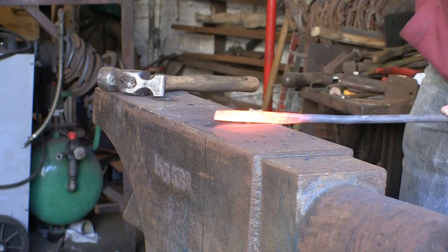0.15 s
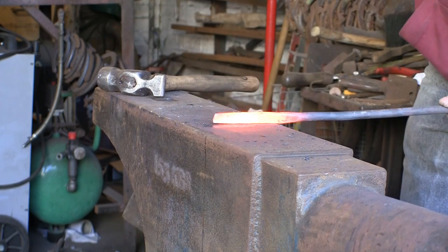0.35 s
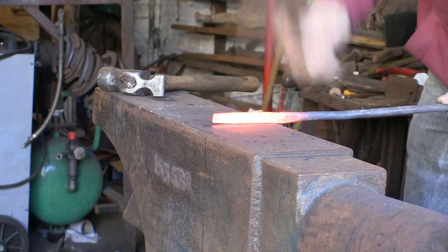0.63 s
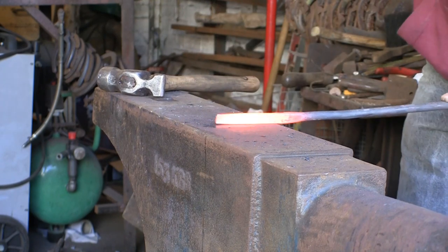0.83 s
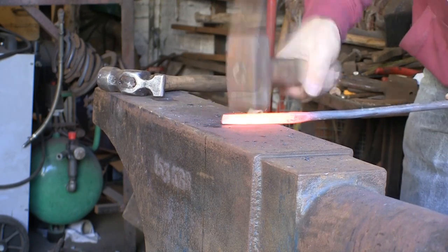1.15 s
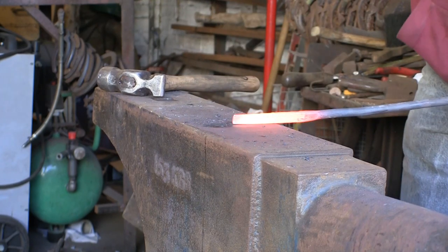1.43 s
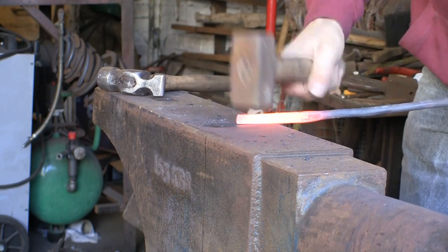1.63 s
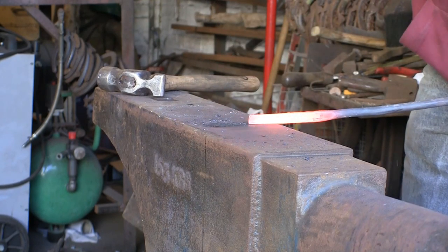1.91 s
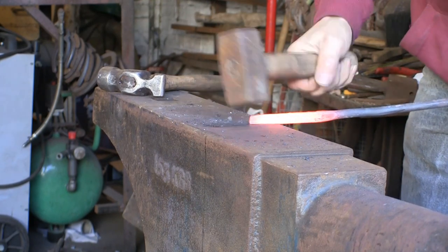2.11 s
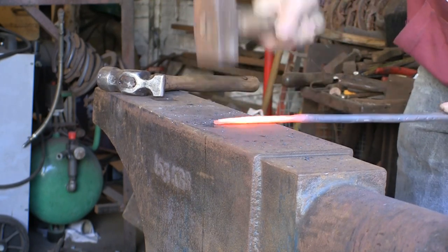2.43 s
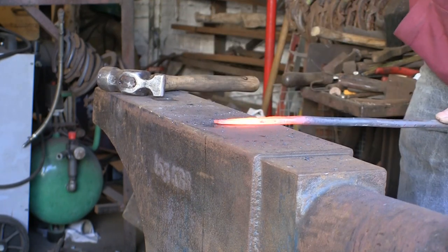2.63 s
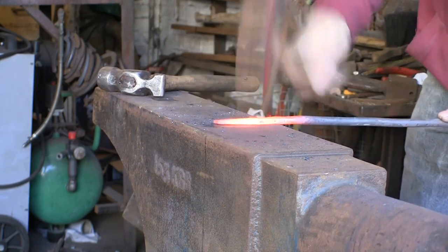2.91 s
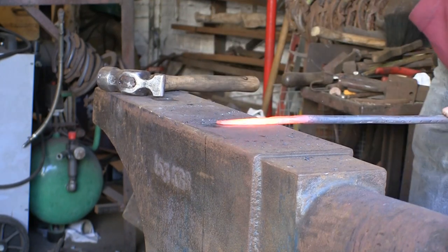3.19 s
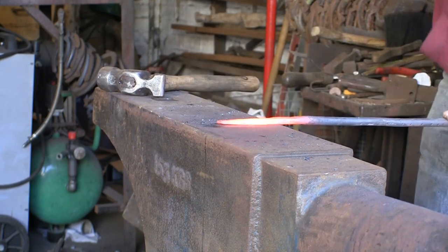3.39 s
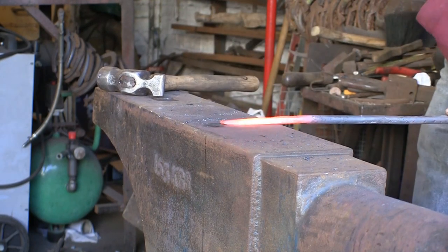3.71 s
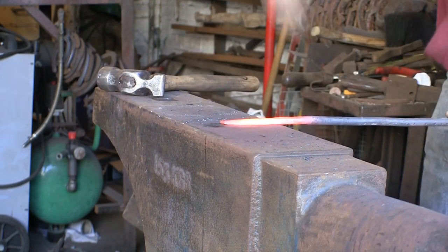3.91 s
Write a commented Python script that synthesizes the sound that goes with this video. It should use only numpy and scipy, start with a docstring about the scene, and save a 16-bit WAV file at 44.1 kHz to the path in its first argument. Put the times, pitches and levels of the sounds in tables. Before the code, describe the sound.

Four duller hammer blows on an anvil, a light clack of the turning bar, then two brighter ringing strikes, with fire rumbling softly behind.

```python
"""In a small, cluttered forge, a smith hammers a red-hot bar of spring steel longer on an anvil.
Four blows land dully on its soft flat side. The bar clacks over onto its edge, and two harder, brighter
blows follow. Each is a crack of steel on steel, a short clang, and the ringing of anvil and hammer.
Behind them the fire rumbles and its blower hums and whines."""
import sys
import numpy as np
from scipy import signal
from scipy.io import wavfile

SR = 44100
rng = np.random.default_rng(int(sys.argv[2]) if len(sys.argv) > 2 else 0)


def unload_audio(sound):
    """Save the sound as a 16-bit wav file, at the path given as the first command line argument."""
    columns = np.transpose(np.atleast_2d(sound))
    # keep every value between -1 and 1, then stretch to whole-number steps
    steps = np.round(np.clip(columns, -1, 1) * 32767)
    wavfile.write(sys.argv[1], SR, steps.astype(np.int16))


N = 178781

# Thirty bands from bass to treble: their edges and centres in Hz, and a filter for each.
EDGES = np.geomspace(20, 17000, 31)
CENTRES = np.sqrt(EDGES[1:] * EDGES[:-1])
FILTERS = [signal.butter(2, pair, "band", fs=SR, output="sos") for pair in zip(EDGES, EDGES[1:])]
AGE = np.arange(SR // 2) / SR   # seconds since a short sound began


def hammering():
    """Each blow: a crack, a clang, and the ring of anvil and hammer, choked by the soft hot steel."""
    # Each row: start in seconds, force in dB, hardness (0 on the flat, 1 on the edge), hammer ring in dB.
    blows = [(0.7648, -0.16, 0, -57), (1.267, 0, 0.068, -52), (1.7357, -0.01, 0.082, -52),
             (2.196, -2.5, 0, -63), (3.0358, -0.5, 0.97, -44.5), (3.5578, -0.7, 1, -47)]
    # Each row: pitch in Hz, level in dB, seconds to fade by 60 dB.
    anvil_tones = [(481, -13, .12), (550, -12, .12), (635, -8, .1), (780, -13, .1), (1243, -2, .25),
                   (1305, -3, .15), (1418, -4, .12), (1541, -2, .16), (1590, 4, .17), (1669, -4, .12),
                   (1765, -7, .12), (2466, 5, .17), (2675, -6, .12), (2765, -8, .12)]
    # Each row: pitch in Hz, level in dB, seconds to fade by 60 dB, extra dB in a hard blow.
    hammer_tones = [(4690, -20, .2, 7), (5324, -11, .33, 2), (6247, -8, .16, 0), (6328, -8, .2, 1),
                    (6755, -1.5, .17, 0), (6828, -8, .12, 0), (7220, -12, .2, 1), (8660, -15, .15, 0),
                    (8742, -17, .15, 3), (8905, -20, .3, 9.5), (12230, -29, .2, 8), (14200, -32, .2, 8),
                    (15110, -29, .42, 11), (15230, -35, .6, 12), (15331, -33, .75, 12),
                    (15420, -37, .65, 12)]
    out = np.zeros((2, N))
    for start, force_db, hardness, hammer_db in blows:
        # Smith and bar move, so every blow echoes differently.
        room = workshop(scatter_db=12, build_s=.0015, linger=1.156 + .37 * hardness)
        anvil = [(hz, db + contact_colour(force_db, hardness, hz), fade) for hz, db, fade in anvil_tones]
        hammer = [(hz, db + hardness * extra_db, fade) for hz, db, fade, extra_db in hammer_tones]
        colour_db = contact_colour(force_db, hardness, CENTRES)
        add(out, start, from_db(-39) * clang(colour_db, room, crush_db=4, crush_s=.0056))
        add(out, start, from_db(-32.5 + force_db + 14 * hardness) * crack())
        add(out, start, from_db(-55.5 + .93 * force_db) * ringing_steel(anvil, room))
        add(out, start, from_db(hammer_db) * ringing_steel(hammer, room))
    return out


def contact_colour(force_db, hardness, hz):
    """Change in dB at a pitch: a stronger, harder blow makes shorter contact and sounds brighter."""
    by_force = force_db * (1 + 3.4 * treble_share(hz, knee_hz=2000))
    # On its edge the steel gives less: less thud, more treble.
    by_hardness = hardness * (-3.5 + 9.5 * treble_share(hz, knee_hz=2960))
    return by_force + by_hardness


def crack(hz=3750, fade_s=.006, gap_s=.00053):
    """Steel meets steel twice in an instant: hammer on bar, bar on anvil."""
    sides = [ring(hz, fade_s, lag) + ring(hz, fade_s, lag + gap_s) for lag in (1 / SR, 0)]
    return pan(hz) * np.array(sides)


def clang(colour_db, room, crush_db, crush_s):
    """The hit, and the crushing of the hot bar's flaky crust, set off a crowd of short-lived tones."""
    # Each row: pitch in Hz, strength of the clang there in dB per Hz.
    spectrum = [(110, -12), (300, -9), (440, -15.5), (620, -1), (950, -11), (1300, 1), (1650, 3.5),
                (2100, -11), (2900, -4.5), (3900, -5), (5000, -13), (6700, -7), (9700, -16.5), (12000, -14),
                (16000, -23)]
    squeeze = np.sqrt(AGE) * np.exp(-AGE / crush_s)   # the force swells and lets go as the steel gives
    crush = from_db(crush_db) * rms_one(rng.standard_normal(len(AGE)) * squeeze) / np.sqrt(len(AGE))
    levels_db = at_hz(spectrum, CENTRES) + colour_db
    out = 0
    for k, (sos, hz, db) in enumerate(zip(FILTERS, CENTRES, levels_db)):
        if hz > spectrum[0][0]:
            band = even_sides(signal.sosfilt(sos, room + crush))
            # Flipping every other band joins them smoothly.
            out += (-1) ** k * from_db(db) * np.sqrt(hz / SR) * pan(hz) * band
    return out


def ringing_steel(tones, room):
    """Every strike shares its energy among the tones a little differently; the room echoes each one."""
    out = 0
    for k, (hz, db, fade_s) in enumerate(tones):
        direct = even_sides([ring(hz, fade_s, lag) for lag in (1 / SR, 0)])
        echo = signal.fftconvolve(ring(hz, fade_s / 2)[None], room, axes=1)[:, :len(AGE)]
        gain = from_db(db + rng.standard_normal())
        out += (-1) ** k * gain * pan(hz) * even_sides(direct + even_sides(echo))
    return out


def ring(hz, fade_s, lag_s=0):
    """One tone of struck steel: it starts after lag_s and dies away by 60 dB in fade_s."""
    age = AGE - lag_s
    return (age >= 0) * np.cos(2 * np.pi * hz * age) * from_db(-60 * age / fade_s)


def bar_turn(start=2.3665):
    """The bar clacks over onto its edge on the anvil and rings briefly."""
    # Each row: pitch in Hz, level in dB, seconds to fade by 60 dB.
    bar_tones = [(1598, -7, .12), (2947, -5, .25), (3205, -8, .2), (3733, -8, .1), (3925, -5, .12),
                 (3978, -3, .15), (4032, -3, .2), (6325, -8, .15)]
    # Each row: pitch in Hz, dB that this light contact adds to the clang.
    colour = [(500, -0.5), (1400, -0.5), (2800, 5.5), (4100, 4.5), (7000, 4.5), (9500, -3.5)]
    out = np.zeros((2, N))
    room = workshop(scatter_db=10, build_s=.002, linger=1.45)
    add(out, start, from_db(-33) * crack())
    add(out, start, from_db(-55) * clang(at_hz(colour, CENTRES), room, crush_db=2.5, crush_s=.0045))
    add(out, start, from_db(-60.5) * ringing_steel(bar_tones, room))
    return out


def light_knocks():
    """Faint knocks sound in the room, just after the turn and after the last blow."""
    # Each row: start in seconds, level in dB, middle pitch in Hz, width in Hz.
    knocks = [(2.428, -78, 12000, 7000), (4.021, -59, 160, 150), (4.0245, -69.5, 1500, 600)]
    out = np.zeros((2, N))
    room = workshop(scatter_db=4, build_s=.002)
    for start, db, hz, width in knocks:
        body = signal.butter(2, [hz - width / 2, hz + width / 2], "band", fs=SR, output="sos")
        add(out, start, from_db(db) * rms_one(signal.sosfilt(body, room)))
    return out


def forge_fire(level_db=-60):
    """The steady rush of the fire; its low rumble flutters more than its hiss."""
    # Each row: pitch in Hz, relative strength of the rush in dB per Hz.
    spectrum = [(20, 1.5), (40, -16), (72, -2.5), (100, -2), (200, -11), (350, -17), (500, -19),
                (1000, -25), (2000, -25.5), (4000, -28), (7000, -27.5), (10000, -33), (16000, -36.5)]
    # Each row: pitch in Hz, how alike left and right are (1 is the same).
    likeness = [(100, 1), (300, 1), (1000, 0.6), (3000, 0.15), (12000, 0.67)]
    out = 0
    for sos, hz in zip(FILTERS, CENTRES):
        flutter_db = (1.2 if hz < 300 else .4) * drift(rate_hz=8)
        out += stereo_noise(sos, at_hz(likeness, hz), N) * from_db(at_hz(spectrum, hz) + flutter_db)
    return from_db(level_db) * rms_one(out)


def blower(speed_wander=.00066):
    """Blower and motor hum unsteadily, and a thin whine follows the fan's speed."""
    # Each row: pitch in Hz, level in dB, width of the wavering in Hz.
    hum_tones = [(74, -61, 5.9), (122.8, -66, 7.3), (200.4, -70, 5), (253.4, -72, 9.3), (306.6, -77.5, 2.6),
                 (348.4, -75, 3.04)]
    # Each row: pitch in Hz, level in dB.
    whine_tones = [(1213, -71.5), (2426, -80.5), (3639, -84), (4275, -86)]
    t = np.arange(N) / SR
    hum = whine = 0
    for hz, db, width in hum_tones:
        waver = drift(width / 2) + 1j * drift(width / 2)   # shakes both loudness and pitch
        hum += from_db(db) * rms_one(np.real(waver * np.exp(2j * np.pi * hz * t)))
    fan_time = t + speed_wander * np.cumsum(drift(.61)) / SR   # runs fast or slow with the fan
    for hz, db in whine_tones:
        whine += from_db(db + .5 * drift(2.2)) * np.sqrt(2) * np.sin(2 * np.pi * hz * fan_time)
    return hum + whine


def workshop(scatter_db, build_s, linger=1):
    """The room's answer to a click: direct sound, near echoes, and a tail scattered by the clutter."""
    # Each row: pitch in Hz, how alike left and right are (1 is the same).
    likeness = [(100, 0.93), (250, 0.88), (500, 0.91), (1200, 0.16), (2500, 0.064), (5000, 0.082),
                (12000, 0.24)]
    # Each row: pitch in Hz, seconds to fade by 60 dB before linger stretches them.
    fades = [(150, 0.29), (600, 0.23), (1500, 0.22), (4000, 0.21), (8000, 0.18), (15000, 0.19)]
    # Floor and near walls. Each row: delay in seconds, level in dB.
    echoes = [(.0068, -6), (.0085, -26), (0.0133, 0)]
    tail = 0
    for sos, hz in zip(FILTERS, CENTRES):
        fade = from_db(-60 * AGE / (linger * at_hz(fades, hz)))
        tail += stereo_noise(sos, at_hz(likeness, hz), len(AGE)) * fade
    tail *= 1 - np.exp(-AGE / build_s)
    room = from_db(scatter_db) * rms_one(tail) / np.sqrt(len(AGE))
    room[[0, 1], [1, 0]] += 1   # the direct sound reaches the nearer, right side first
    for k, (delay, db) in enumerate(echoes):
        left = round(delay * SR)
        right = left + 3 * (-1) ** k   # echoes come from each side in turn
        room[[0, 1], [left, right]] += from_db(db)
    return room


def pan(hz):
    """Left and right gain at a pitch."""
    # Each row: pitch in Hz, left level minus right level in dB.
    balance = [(150, -.4), (700, -1.3), (1300, 1.9), (2800, 1.6), (6800, 2.4), (9500, -1.7), (14000, -4.3)]
    return from_db(at_hz(balance, hz) * np.array([[.5], [-.5]]))


def stereo_noise(sos, alike, size):
    """One band of noise, partly shared between the ears."""
    shared, opposed = signal.sosfilt(sos, rng.standard_normal((2, size + SR // 4)))[:, -size:]
    return np.sqrt(1 + alike) * shared + np.sqrt(1 - alike) * opposed * [[1], [-1]]


def drift(rate_hz):
    """A slow random wobble, about 1 in size, worked out every 100 samples."""
    memory = np.exp(-200 * np.pi * rate_hz / SR)
    noise = rng.standard_normal(N // 100 + 1002)
    slow = signal.lfilter([1], [1, -2 * memory, memory * memory], noise)[1000:]
    return np.interp(np.arange(N) / 100, np.arange(len(slow)), rms_one(slow))


def treble_share(hz, knee_hz):
    """How much a pitch counts as treble: 0 far below the knee, 1 far above."""
    return 1 / (1 + (knee_hz / hz) ** 5)


def from_db(db):
    """Turn decibels into a gain."""
    return 10 ** (np.asarray(db) / 20)


def rms_one(x):
    """Scale a sound to an average strength (rms) of 1."""
    return x / np.sqrt(np.mean(x ** 2) + 1e-20)


def even_sides(sides):
    """Bring left and right each to a strength of 1."""
    return np.array([rms_one(side) for side in sides])


def at_hz(table, hz):
    """Read a table at a pitch, sliding between its rows."""
    pitches, values = np.transpose(table)
    return np.interp(np.log(hz), np.log(pitches), values)


def add(out, start, sound):
    """Mix a sound in at a start time in seconds."""
    i = round(start * SR)
    out[:, i:i + sound.shape[-1]] += sound[..., :N - i]


def scene():
    """The anvil close by, the fire and blower behind."""
    return hammering() + bar_turn() + light_knocks() + forge_fire() + blower()


def record(dry):
    """The very highest treble is cut off steeply."""
    cutoff_hz = 15850
    return signal.sosfilt(signal.ellip(12, .1, 70, cutoff_hz, fs=SR, output="sos"), dry)


dry = scene()
out = record(dry)
unload_audio(out)
```